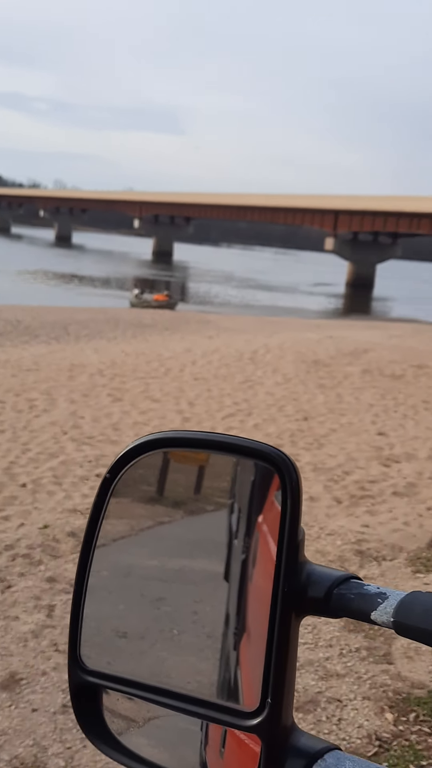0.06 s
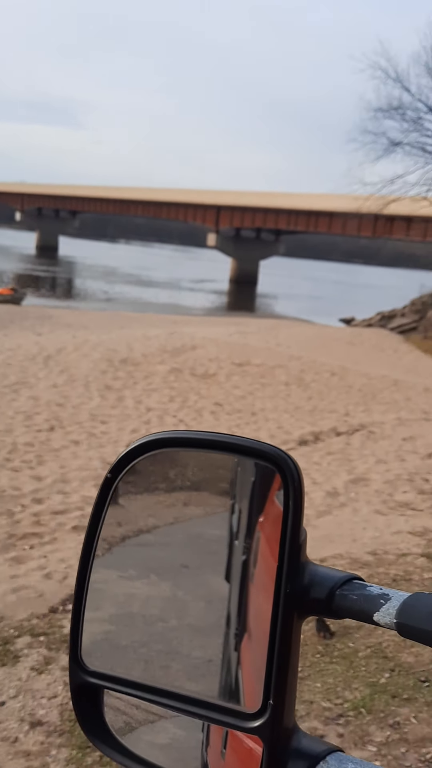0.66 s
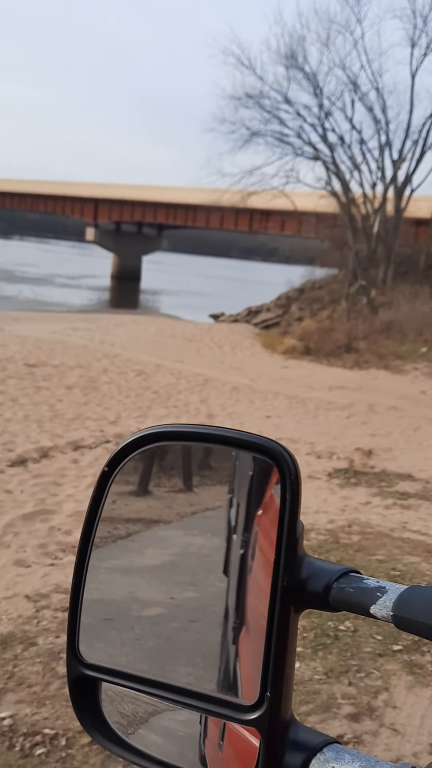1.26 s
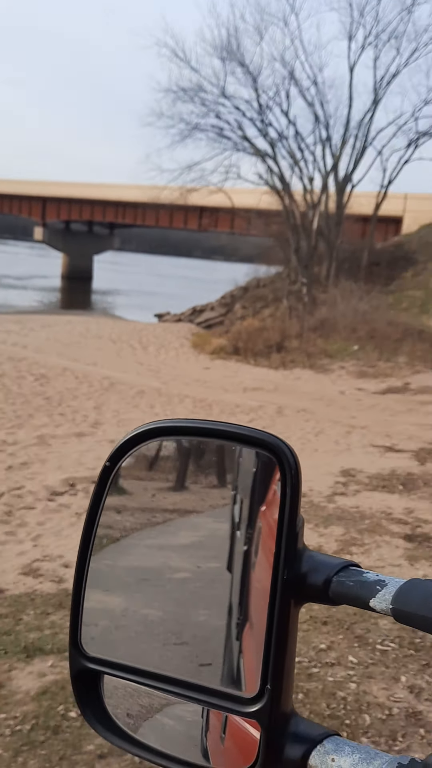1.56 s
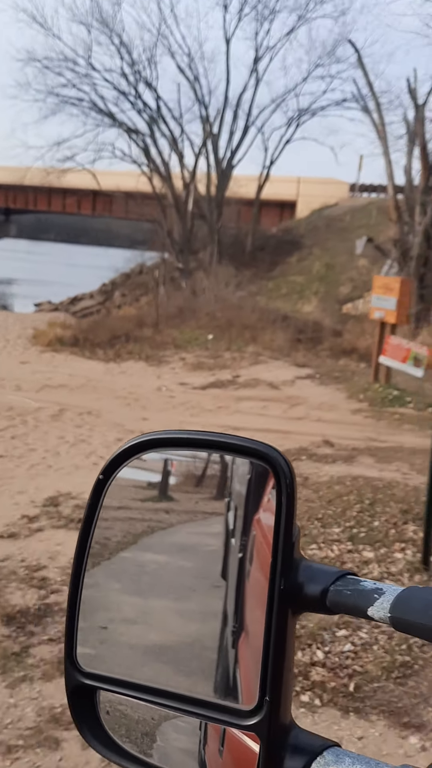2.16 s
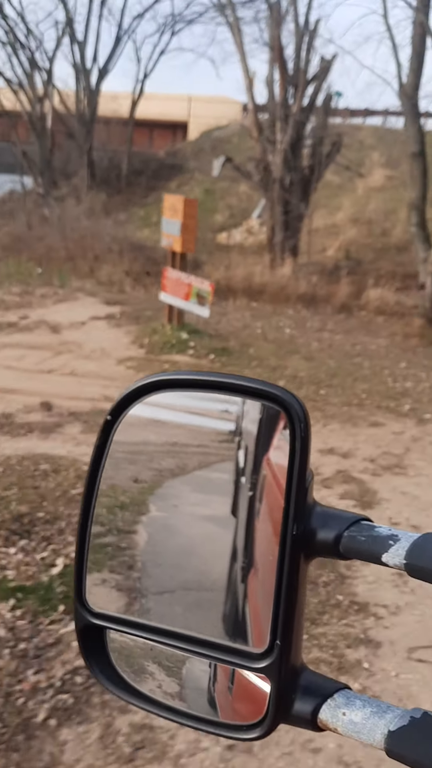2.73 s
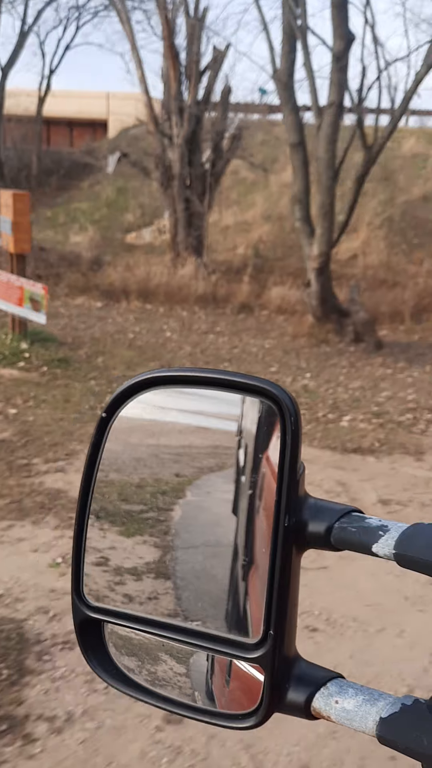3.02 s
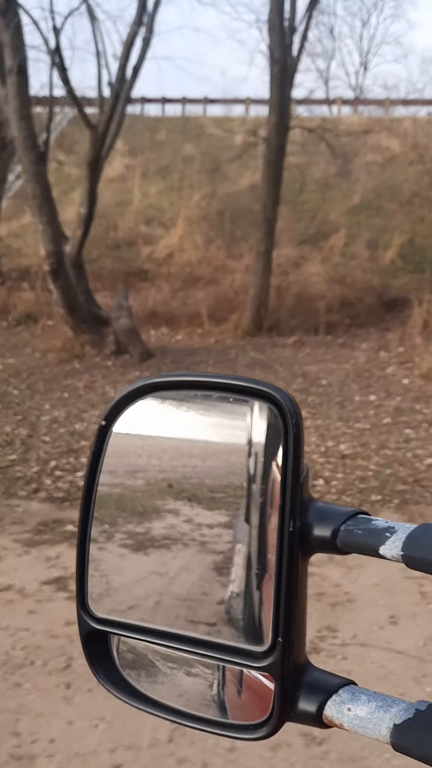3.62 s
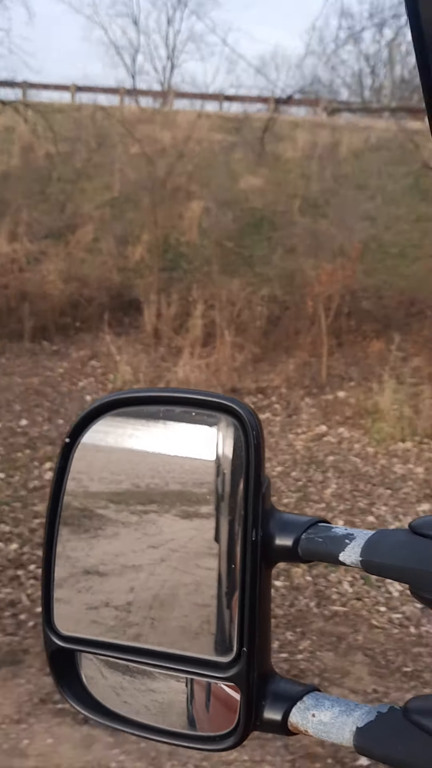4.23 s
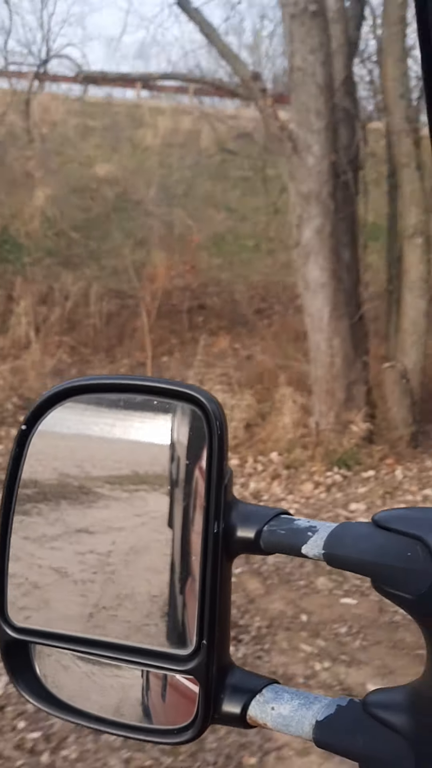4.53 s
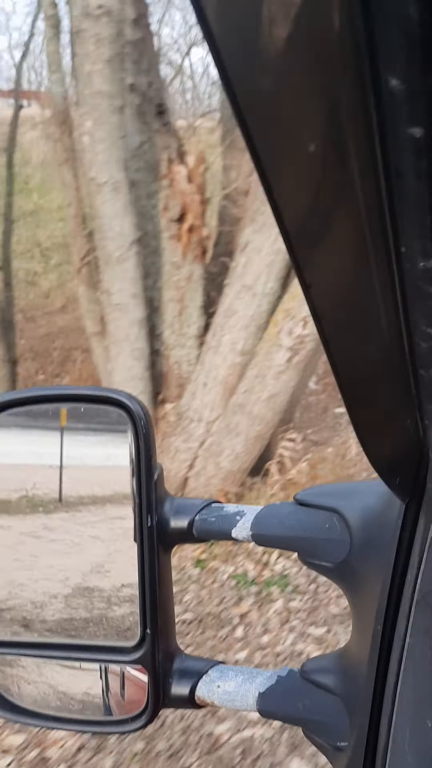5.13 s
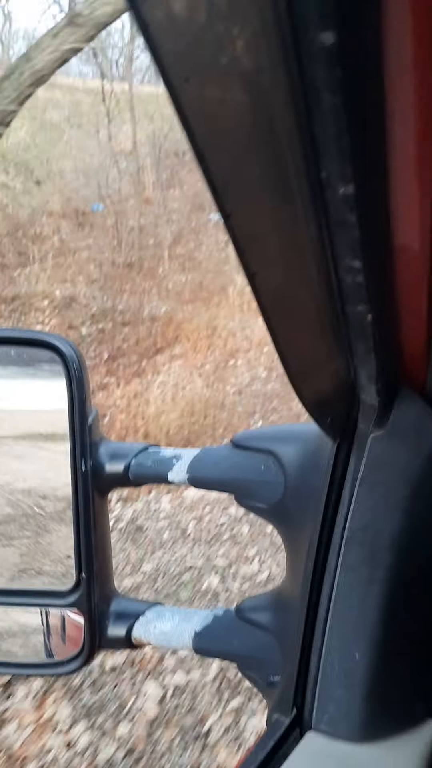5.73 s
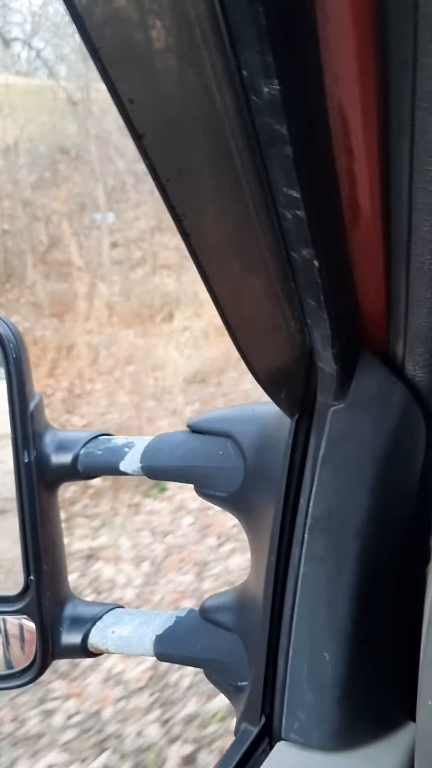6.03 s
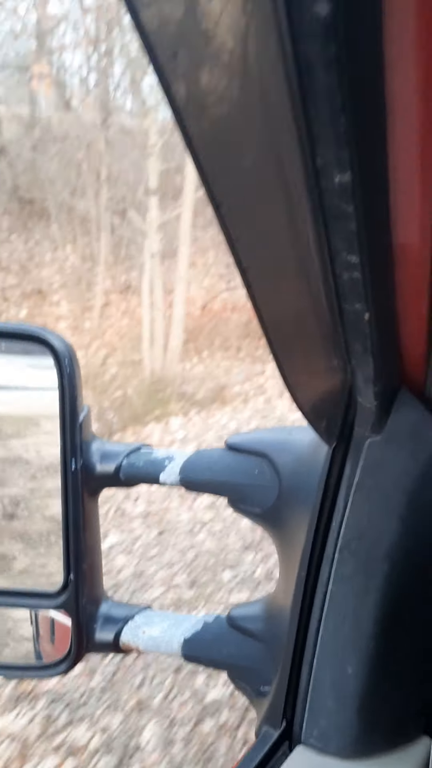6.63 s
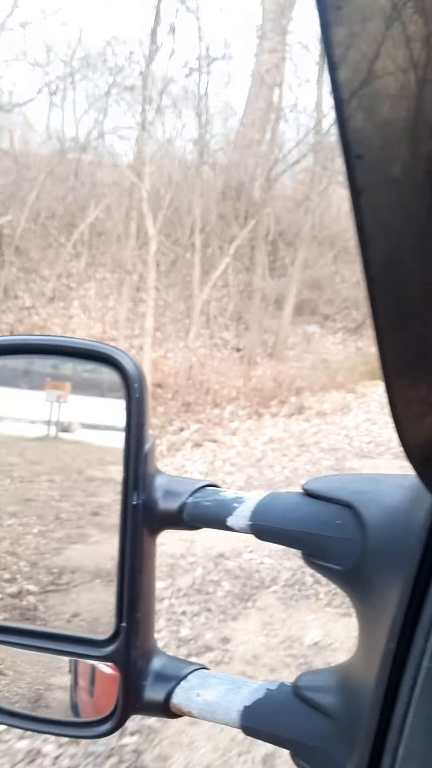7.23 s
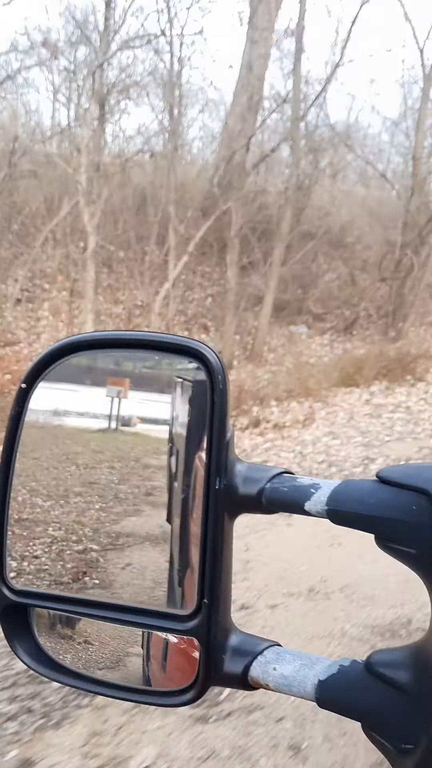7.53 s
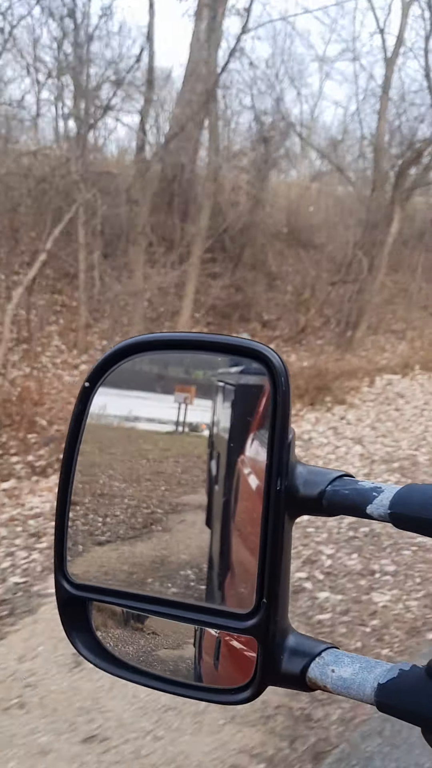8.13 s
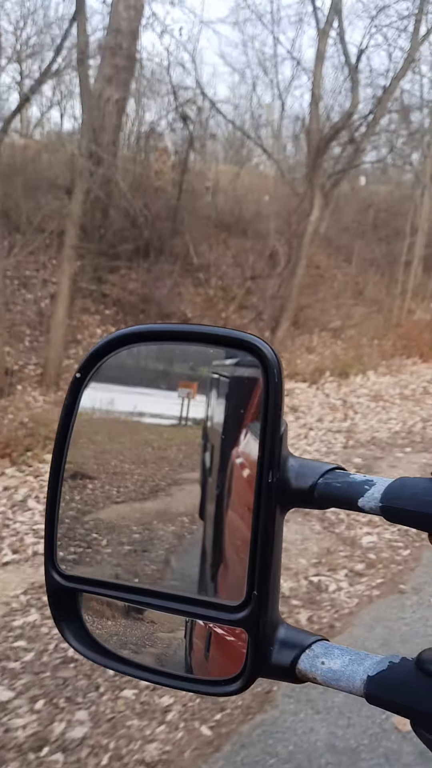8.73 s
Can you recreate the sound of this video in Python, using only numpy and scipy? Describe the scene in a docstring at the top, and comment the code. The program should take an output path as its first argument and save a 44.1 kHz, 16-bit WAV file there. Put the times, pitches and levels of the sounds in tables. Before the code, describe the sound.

From inside a slow-moving pickup, the engine pulls, eases off and plods on while tyres rumble, the body knocks and keys faintly clink.

```python
"""A V8 pulls over beach sand, heard in a pickup's cab by the open window, as a finger bumps the left mic.
The engine eases off, then plods on along a dirt track: its firings boom in the exhaust and growl and
clatter through the engine bay. Under it the tyres rumble over lumps, hiss on sand and crunch stones.
On the track, bumps knock the body, trim snaps, grit ticks and dangling keys clink."""
import sys
import numpy as np
from scipy import signal
from scipy.fft import rfft, irfft, next_fast_len
from scipy.io import wavfile

SR = 44100
rng = np.random.default_rng(int(sys.argv[2]) if len(sys.argv) > 2 else 0)


def int16_out(signal):
    """Quantize to a 16-bit WAV file."""
    q = np.round(np.clip(np.atleast_2d(signal).T, -1, 1) * 32767)
    wavfile.write(sys.argv[1], SR, q.astype(np.int16))


N = 391166

# Stereo width of the cab. Each row: frequency in Hz, left-right likeness (1 is mono).
EAR_LIKENESS = [(60, 1), (130, 1), (290, 0.87), (640, 0.72), (1410, 0.045), (3100, 0.41), (6820, -0.12),
                (15000, 0.02)]
# Tone of the thin hiss. Each row: frequency in Hz, level in dB.
HISS_SPECTRUM = [(3000, -33), (7000, -0.5), (9200, -2), (11000, 3), (13500, 4), (16000, 1.5)]
# Finger bumps on the left mic. Each row: start in seconds, peak in dB, pitch in Hz, length in seconds.
HANDLING_THUMPS = [(0.12, -10.5, 152, 0.022), (0.199, -2, 234, 0.0091), (0.207, -2.5, 127, 0.0095),
                   (0.236, -8, 288, 0.017), (2.103, -1.5, 169, 0.011), (2.120, -1.5, 336, 0.0089),
                   (2.121, -22, 900, 0.0079), (2.174, -3, 170, 0.0064), (2.2, -11, 144, 0.037),
                   (2.235, -4, 267, 0.013), (2.293, -2, 265, 0.012), (2.341, -9.5, 296, 0.0071)]
# Keys touching. Each row: start in seconds, then the level in dB of each of the three keys.
KEY_CLINKS = [(4.73, -70, -70, -56), (5.2146, -55, -62, -53), (5.9047, -47, -57, -32),
              (5.915, -58, -64, -35), (6.025, -60, -72, -68), (6.1924, -60, -51, -44),
              (6.6594, -60, -65, -47), (7.2802, -70, -68, -52), (7.454, -68, -63, -46)]
# One list of modes per key. Each row: pitch in Hz, level in dB, 60 dB ring time in seconds.
KEY_MODES = [
    [(5420, -7, .1), (6952, 0, .36)],
    [(9748, 4, .22), (12875, 8, .09)],
    [(8858, -9, .07), (14365, 1, .08), (14550, -6, .045), (14800, -9, .025), (15100, -9, .02)],
]
# Grit and cracking stones. Each row: start in seconds, level in dB, pitch in Hz, decay in seconds,
# left over right in dB.
GRIT_TICKS = [(0.2114, -8, 1640, 0.00056, 6), (0.2113, -18, 2900, 0.0005, 8),
              (4.263, -25.5, 990, 0.0044, 1), (4.4241, -17, 2500, 0.00046, 3),
              (4.424, -17, 8000, 0.00019, 5), (4.824, -29, 6400, 0.0019, 0),
              (5.1446, -32, 6900, 0.00082, 3), (5.674, -24, 1890, 0.0054, 1), (5.806, -24.5, 950, .005, 1),
              (6.005, -27, 2200, 0.0043, 1), (6.02, -26, 2180, 0.0043, 1), (6.225, -25, 943, .006, 1),
              (6.297, -26, 980, .004, 1), (6.481, -23, 1920, 0.0054, 1), (6.513, -18.5, 1200, 0.0037, 1),
              (6.634, -30, 1590, .003, 1), (6.818, -23.5, 1210, .004, 1), (6.849, -28, 980, 0.0044, -1),
              (6.861, -30, 5600, 0.0033, 2), (6.869, -26, 1720, .003, 1), (6.888, -24, 1830, .004, 1),
              (7.105, -24, 2200, .005, 1), (7.38, -21.5, 5700, 0.0042, 1), (8.343, -23, 1100, 0.0034, 1)]
# Trim close by. Each row: start in seconds, level in dB, left over right in dB, left delay in ms.
TRIM_SNAPS = [(4.4389, 0, -2, 0.29), (7.138, -11, -3, 0.25)]
# Modes of the trim and the body. Each row: pitch in Hz, level in dB, 60 dB ring time in seconds.
TRIM_MODES = [(1400, -17, 0.0027), (2300, -2, 0.0031), (4260, 6, 0.0021), (6800, 1, .0014),
              (11500, -5, .0018), (14000, 0, .0024)]
BODY_MODES = [(121, -20, 0.073), (168.7, 5.5, 0.26), (214, 4, 0.042), (255, -20, 0.051), (307, 5.5, 0.1),
              (327, -6, 0.26), (397.7, -28, 0.041), (530, -7, 0.046), (634, -15, 0.085), (935, -6, 0.014),
              (1320, -16, .03)]
# Bumps that knock the body. Each row: start in seconds, level in dB, favoured pitch in Hz.
BODY_KNOCKS = [(4.590, -9.5, 950), (4.808, -20, 380), (4.835, -12.5, 192), (5.118, -19.5, 320),
               (5.186, -12, 330), (5.208, -11, 259), (5.597, -7, 310), (5.621, -12.5, 315),
               (5.649, -16.5, 650), (5.661, -8.5, 258), (6.061, -8, 300), (6.075, -5.5, 213),
               (6.119, -12, 290), (6.128, -15, 950), (6.76, -18, 304)]
# Roughness of the ground. Each row: time in seconds, roughness in dB.
GROUND_ROUGHNESS = [(0, 0), (.4, -3.5), (.75, -1.27), (2.05, 0.59), (2.4, -5), (3.45, -5.5), (4.15, 5),
                    (4.6, 1), (5.3, 1), (6.9, -0.5), (8.87, 0.9)]
# Tone of the tyre rumble, tread roar and sand hiss. Each row: frequency in Hz, level in dB.
RUMBLE_SPECTRUM = [(15, -36), (28, -25), (42, -5), (60, 4), (100, 3.5), (160, 2), (220, -7.5), (320, -8.5),
                   (450, -24.5), (900, -71)]
ROAR_SPECTRUM = [(120, -6.5), (240, -11), (310, 7.5), (370, -2.5), (460, 3), (700, -6.5), (1000, -5),
                 (1600, -9.5), (2500, -21), (4000, -50)]
SAND_SPECTRUM = [(1500, -8.5), (2600, 7.5), (3400, 4.5), (4500, 0.5), (5400, 0), (7000, -1.5), (8200, -5),
                 (9300, -27), (11000, -31), (15500, -23)]
# Resonances of the cab's air, wheel arch and engine bay. Each row: centre in Hz, width in Hz, lift in dB.
CAB_RESONANCES = [(61.6, 7.4, 3.5), (148, 6.8, 3.5)]
ARCH_RESONANCES = [(2860, 160, 3.5), (3880, 250, 3), (4440, 170, 5.5), (4900, 300, 4.5), (7200, 500, 0.5)]
BAY_RESONANCES = [(314.5, 26.7, 12), (438, 38, 12), (583, 16, 11), (666, 45, 10.5), (1241, 92, 9),
                  (1583, 43, 5), (1650, 30, 6), (2170, 67, 5), (4570, 320, 5)]
# The revs. Each row: time in seconds, firings per second.
FIRING_RATE = [(0, 51.2), (.35, 50.6), (.64, 61.2), (.82, 66.2), (1.1, 67.6), (1.44, 65.4), (1.7, 66.2),
               (1.92, 65.3), (2.08, 65.2), (2.28, 56.8), (2.55, 57.6), (2.95, 53.5), (3.25, 54), (4.3, 53),
               (4.95, 45), (5.6, 45), (6.5, 47.7), (7.2, 48.9), (8.87, 48)]
# The pull: up the sand, off the throttle, on again. Each row: time in seconds, effort in dB.
ENGINE_EFFORT = [(0, -1), (.35, -3), (.7, -1), (2.08, 1.5), (2.14, -3.5), (2.45, -5), (3.55, -6),
                 (3.85, -1), (5, -1.5), (6.3, 1.5), (7, -0.1), (8.87, 0.5)]
# Engine bay whistles. Each row: pitch in Hz, width in Hz.
WHISTLE_TONES = [(1255, 22), (1612, 24)]
# Their levels. Each row: level in dB, dB gained per dB of effort.
WHISTLE_DRIVE = [(-50.5, 0.92), (-56.5, 0.7)]
# Orders that sing out. Each row: start and end in seconds, multiple of the firing rate, level in dB,
# left over right in dB.
WHINE_CUES = [(.7, 2.1, 6.875, -49, 3), (.65, 2.1, 10, -52, 3), (1.2, 2.1, 12, -48, 4),
              (.6, 2.1, 13, -52, 3), (1.3, 2.1, 22.375, -54, 2), (1.15, 2.124, 24.375, -47, 1),
              (2.7, 4.3, 10.5, -51, 3), (2.8, 3.7, 10, -54, 2), (2.7, 3.7, 11, -54, 2),
              (2.65, 3.5, 15, -61, 0), (2.85, 3.7, 23.5, -56, 0), (2.4, 3.7, 31.25, -59, 0),
              (7.4, 8.87, 9, -50, 5)]
# Tone of the clatter. Each row: frequency in Hz, level in dB.
CLATTER_SPECTRUM = [(120, 0.5), (220, 4), (450, -2), (700, -6.5), (1100, -6), (1450, -2), (1750, 3.5),
                    (2100, -7.5), (2600, -12.5), (3200, -15), (4700, -19.5), (5500, -30), (9000, -74)]
# Firing strength in dB of each of the eight cylinders in turn.
CYLINDER_DB = [4, -0.6, 3, 2, 1.5, 3.5, 0.5, 3]
# The weaker orders that growl. Each row: multiple of the firing rate, level in dB.
GROWL_ORDERS = [(1.5, -8), (2.5, -8), (3.25, -13.5), (4, -11.5), (4.625, -19), (5.5, -22.5), (6, -17),
                (6.875, -22.5), (8, -20), (9, -25.5), (10, -32.5), (12, -30), (13, -28.5), (14, -28.5),
                (15, -22.5), (22.375, -27), (26, -31)]
# First, second and third exhaust order. Each row: level in dB, dB gained per dB of effort.
EXHAUST_ORDERS = [(-.5, 1), (1.1, 1.2), (-6.5, 1.5)]
# How the cab booms with the exhaust. Each row: pitch in Hz, gain in dB.
CAB_RESPONSE = [(45, -29.5), (54, -35.5), (66, -32), (90, -35), (104, -29), (134, -26.5), (146, -26.5),
                (162, -36), (200, -38.5)]

# Layer faders. Each pair: level in dB, dB gained per dB of ground roughness or engine effort.
RUMBLE_LEVEL, ROAR_LEVEL, GRAVEL_LEVEL = (-27.5, 0.89), (-35, 0.81), (-46.5, 0.59)
SAND_LEVEL, HISS_LEVEL = (-49, 1.16), (-55, 0.86)
CLATTER_LEVEL, GROWL_LEVEL = (-39, 0.99), (-33, 1)
SAND_ENDS_S, SAND_FADE_S = 3.5, 0.5
CUTOFF_HZ = 15900


def from_db(db):
    """Decibels to gain."""
    return 10 ** (np.asarray(db) / 20)


def rms_one(x):
    """Scale to rms 1."""
    return x / np.sqrt(np.mean(x ** 2) + 1e-20)


def in_time(curve):
    """Read a curve sample by sample."""
    return np.interp(np.arange(N) / SR, *np.transpose(curve))


def at_hz(points, hz):
    """Read a spectrum on a log-frequency axis."""
    points = np.array(points)
    return np.interp(np.log(hz + 1e-9), np.log(points[:, 0]), points[:, 1])


def peaks_db(resonances, hz):
    """Lift that a set of resonances gives at these frequencies."""
    return sum(top / (1 + (2 * (hz - centre) / width) ** 2) for centre, width, top in resonances)


def pan(db):
    """Left and right gains, the left louder by db."""
    return from_db(np.array([[.5], [-.5]]) * db)


def left_lift(db):
    """Gains that raise the left channel alone."""
    return from_db(np.array([[1], [0]]) * db)


def swell(start_s, end_s, fade_s):
    """Rise from 0 to 1, hold, fall back."""
    t = np.arange(N) / SR
    return np.clip(np.minimum(t - start_s, end_s - t) / fade_s, 0, 1)


def hold_until(end_s, fade_s):
    """Hold at 1, then fade to 0."""
    return 1 - np.clip((np.arange(N) / SR - end_s) / fade_s, 0, 1)


def driven(level, control_db):
    """Gain of a layer that rides a control."""
    db, follows = level
    return from_db(db + follows * control_db)


def drift(rate_hz):
    """A slow random wobble of rms about 1."""
    r = np.exp(-80 * np.pi * rate_hz / SR)
    slow = signal.lfilter([1], [1, -2 * r, r * r], rng.standard_normal(N // 40 + 2002))[2000:]
    return np.interp(np.arange(N) / 40, np.arange(len(slow)), rms_one(slow))


def noise():
    """Two unrelated white noises."""
    return rng.standard_normal((2, N))


def band_noise(order, low_hz, high_hz, shape):
    """Band-passed noise of rms 1."""
    band = signal.butter(order, [low_hz, high_hz], "band", fs=SR, output="sos")
    return rms_one(signal.sosfilt(band, rng.standard_normal(shape)))


def ring(x, hz, t60):
    """A resonator: a unit click sets a sine of height 1 ringing."""
    r, w = from_db(-60 / (t60 * SR)), 2 * np.pi * hz / SR
    return signal.lfilter([0, np.sin(w)], [1, -2 * r * np.cos(w), r * r], x + 1e-18)


def struck(hz, t60, t):
    """A struck mode: a sine that dies by 60 dB in t60 seconds."""
    return np.sin(2 * np.pi * hz * t) * np.exp(-np.log(1000) * t / t60)


def add(out, s, sound):
    """Mix a short sound in at s seconds."""
    at = round(s * SR)
    out[..., at:at + sound.shape[-1]] += sound[..., :N - at]


def in_cab(pair, spectrum, resonances=()):
    """Colour two unrelated signals and blend them into left and right, alike in the bass."""
    size = next_fast_len(N)
    hz = np.arange(size // 2 + 1) * SR / size
    alike = np.clip(at_hz(EAR_LIKENESS, hz), 0, .95)
    mid, side = rfft(pair, size) * from_db(at_hz(spectrum, hz) + peaks_db(resonances, hz))
    ears = np.sqrt(1 + alike) * mid + np.sqrt(1 - alike) * side * [[1], [-1]]
    return rms_one(irfft(ears, size)[:, :N])


def hiss(effort_db, swell_db=5.5):
    """A thin hiss, mostly on the left, that rises with effort and swells once."""
    gain = driven(HISS_LEVEL, effort_db) * from_db(swell_db * swell(1.175, 1.64, fade_s=.16))
    return gain * in_cab(noise(), HISS_SPECTRUM) * from_db([[0], [-16]])


def port_wind(level_db=-32, lump_db=-1.5):
    """Wind rumbles in lumps on the left microphone port alone."""
    return from_db(level_db + lump_db * drift(9.7)) * band_noise(2, 60, 220, N) * [[1], [0]]


def handling_thumps(low_hz=75, edge_ratio=1.79, ragged=0.57):
    """A finger bumps and rubs the left mic: a few ragged cycles over a slower heave."""
    out, t = np.zeros(N), np.arange(4096) / SR
    for s, db, hz, length in HANDLING_THUMPS:
        swing = np.sin(2 * np.pi * hz * t) + ragged * band_noise(4, low_hz, edge_ratio * hz, len(t))
        heave = np.sin(np.pi * hz * t)
        thump = (swing + heave) * t * np.exp(-2 * t / length)
        add(out, s, from_db(db) * thump / np.abs(thump).max())
    return out * from_db([[0], [-21]])


def bass_dip(x, below_hz=190):
    """The bass drops out for a moment."""
    thin = signal.sosfilt(signal.butter(2, below_hz, "high", fs=SR, output="sos"), x)
    return x + swell(2.29, 2.66, fade_s=0.16) * (thin - x)


def keys(jingle_per_s=18, jingle_db=-68, scatter_db=1.2):
    """Dangling keys clink now and then and tremble lightly for a while; each rings with its own modes."""
    out, t = np.zeros((2, N)), np.arange(16384) / SR
    touch_rate = jingle_per_s * swell(6.95, 7.75, fade_s=.3)
    touch_times = np.flatnonzero(rng.random(N) < touch_rate / SR) / SR
    jingle = [[s] + [jingle_db] * len(KEY_MODES) for s in touch_times]
    for s, *strengths in list(KEY_CLINKS) + jingle:
        for db, key in zip(strengths, KEY_MODES):
            hz, mode_db, t60 = np.array(key).T
            gains = from_db(db + mode_db + scatter_db * rng.standard_normal((2, len(hz))))
            add(out, s, gains @ struck(hz[:, None], t60[:, None], t))
    return out


def grit(crack=0.18, gain_db=-4.5):
    """Grit snaps: a few cycles of ring and a burst of noise an octave wide around the same pitch."""
    out, t = np.zeros((2, N)), np.arange(2048) / SR
    for s, db, hz, decay, side_db in GRIT_TICKS:
        burst = band_noise(2, hz / np.sqrt(2), min(hz * np.sqrt(2), CUTOFF_HZ), (2, len(t)))
        tick = (np.sin(2 * np.pi * hz * t) / 2 + crack * burst) * np.sqrt(t) * np.exp(-t / decay)
        tick /= np.abs(tick).max(axis=1, keepdims=True)
        add(out, s, from_db(db + gain_db) * pan(side_db) * tick)
    return out


def trim_snaps(scatter_db=1.0):
    """One hard release sets the trim ringing for a millisecond or two; it reaches the right mic first."""
    out, t = np.zeros((2, N)), np.arange(512) / SR
    hz, mode_db, t60 = np.array(TRIM_MODES).T[:, :, None, None]
    for s, db, side_db, lag_ms in TRIM_SNAPS:
        age = np.maximum(t - np.array([[lag_ms / 1000], [0]]), 0)
        gains = from_db(mode_db + scatter_db * rng.standard_normal((len(TRIM_MODES), 2, 1)))
        snap = np.sum(gains * struck(hz, t60, age), axis=0)
        add(out, s, from_db(db) * pan(side_db) * snap / np.abs(snap).max())
    return out


def body_knocks(reach_octaves=.5, rattle=0.1, rattle_s=0.025):
    """Bumps knock the body; each favours the modes near its own pitch and sets loose panels rattling."""
    out, t = np.zeros(N), np.arange(8192) / SR
    hz, mode_db, t60 = np.array(BODY_MODES).T[:, :, None]
    for s, db, centre in BODY_KNOCKS:
        nearness = 1 / (1 + (np.log2(hz / centre) / reach_octaves) ** 2)
        gains = nearness * from_db(mode_db + rng.normal(0, 0.46, hz.shape))
        knock = np.sum(gains * struck(hz, t60, t), axis=0)
        panels = rattle * np.exp(-t / rattle_s) * band_noise(3, 160, 470, len(t))
        add(out, s, from_db(db) * (panels - knock / np.abs(knock).max()))
    return out * pan(2.3)


def gravel(rough_db, on_sand, stones_per_s=80, patch_db=4.5, sand_softens_db=8, ring_cycles=22):
    """Stones crunch under the tread, each a short swelling ring; rough dirt has more and louder ones."""
    loose_patch = swell(5.4, 7, fade_s=.35)
    stony_db = rough_db + patch_db * loose_patch - sand_softens_db * on_sand
    at = np.flatnonzero(rng.random(N) < stones_per_s * from_db(stony_db) / SR)
    pitches = np.geomspace(760, 2250, num=18)
    pitch_index = rng.integers(0, len(pitches), len(at))
    size_db = np.minimum(rng.exponential(1, len(at)), 2)
    clicks = np.zeros((len(pitches), N))
    clicks[pitch_index, at] = from_db(size_db) * rng.choice([-1, 1], len(at))
    crunch = np.zeros((2, N))
    for train, hz in zip(clicks, pitches):
        t60 = ring_cycles / hz
        # ringing twice rounds off the attack
        crunch += ring(ring(train, hz, t60), hz, t60) * pan(rng.normal(1, 2.5))
    return driven(GRAVEL_LEVEL, stony_db) * rms_one(crunch)


def tyre_rumble(rough_db, on_sand, lump_db=2.0, cushion_db=1.5):
    """Lumpy ground shakes the cab; soft sand cushions it a little."""
    gain = driven(RUMBLE_LEVEL, rough_db) * from_db(lump_db * drift(12) - cushion_db * on_sand)
    return gain * in_cab(noise(), RUMBLE_SPECTRUM, CAB_RESONANCES) * pan(0.62)


def tread_roar(rough_db, crunch_db=1.88):
    """The tread roars unevenly, louder on rough ground."""
    gain = driven(ROAR_LEVEL, rough_db) * from_db(crunch_db * drift(27))
    return gain * in_cab(noise(), ROAR_SPECTRUM) * pan(2.3)


def sand_hiss(effort_db, grain_db=1.5):
    """Sand hisses in the wheel arch as the wheels pull."""
    gain = driven(SAND_LEVEL, effort_db) * from_db(grain_db * drift(26))
    return gain * in_cab(noise(), SAND_SPECTRUM, ARCH_RESONANCES) * pan(0.82)


def whistles(effort_db):
    """Air whistles at fixed pitches whatever the revs: noise twice through a narrow resonance."""
    out = np.zeros(N)
    for (hz, width), level in zip(WHISTLE_TONES, WHISTLE_DRIVE):
        b, a = signal.iirpeak(hz, hz / width, fs=SR)
        tone = signal.lfilter(b, a, signal.lfilter(b, a, rng.standard_normal(N)))
        out += driven(level, effort_db) * rms_one(tone)
    return out


def order_tone(firings, multiple, db):
    """One engine order of a given rms level, its phase slightly unsteady."""
    phase = 2 * np.pi * (multiple * firings + rng.random()) + 0.11 * drift(3.2)
    return np.sqrt(2) * from_db(db) * np.sin(phase)


def whines(firings, fade_s=0.2, waver_db=2.4):
    """Single engine orders sing out on cue, fading twice as fast as they swell."""
    out, t = np.zeros((2, N)), np.arange(N) / SR
    for start, end, multiple, db, side_db in WHINE_CUES:
        gate = np.clip(np.minimum(t - start, 2 * (end - t)) / fade_s, 0, 1)
        out += gate * order_tone(firings, multiple, db + waver_db * drift(3.1)) * pan(side_db)
    return out


def clatter(firings, decay_s=0.028, scatter_db=-0.1, repeating=1.2, fresh=1.1):
    """Every cylinder fires with a knock of its own that repeats each cycle, plus a puff of fresh noise."""
    at = np.flatnonzero(np.diff(np.floor(firings)))
    cylinders = np.arange(len(at)) % len(CYLINDER_DB)
    strengths = from_db(np.array(CYLINDER_DB)[cylinders] + scatter_db * rng.standard_normal(len(at)))
    fade = np.exp(-np.arange(2048) / SR / decay_s)
    shared_knock = rng.standard_normal((2, len(fade)))
    knocks = shared_knock + repeating * rng.standard_normal((len(CYLINDER_DB), 2, len(fade)))
    out = np.zeros((2, N))
    for sample, cylinder, gain in zip(at, cylinders, strengths):
        puff = fresh * rng.standard_normal((2, len(fade)))
        add(out, sample / SR, gain * fade * (knocks[cylinder] + puff))
    return in_cab(out, CLATTER_SPECTRUM, BAY_RESONANCES)


def growl(firing_hz, firings, bay_share=0.71, flutter_db=2.6):
    """Higher orders flutter, and swell as they pass through the bay's resonances."""
    out = np.zeros(N)
    for multiple, db in GROWL_ORDERS:
        bay_db = bay_share * peaks_db(BAY_RESONANCES, multiple * firing_hz)
        out += order_tone(firings, multiple, db + bay_db + flutter_db * drift(3.6))
    return out


def exhaust(firing_hz, firings, effort_db, throb_db=1.25):
    """The lowest orders throb, grow with effort and boom where the cab favours them."""
    out = np.zeros(N)
    for multiple, (db, follows) in enumerate(EXHAUST_ORDERS, 1):
        boom_db = db + follows * effort_db + at_hz(CAB_RESPONSE, multiple * firing_hz)
        out += order_tone(firings, multiple, boom_db + throb_db * drift(18))
    return out


def engine(effort_db, left_loud):
    """The V8: exhaust boom, growl, clatter and whines locked to the firings, plus steady whistles."""
    firing_hz = in_time(FIRING_RATE)
    firings = np.cumsum(firing_hz) / SR
    growling = driven(GROWL_LEVEL, effort_db) * growl(firing_hz, firings) * pan(1.4)
    clattering = driven(CLATTER_LEVEL, effort_db) * clatter(firings) * pan(0.69)
    top_end = clattering + whistles(effort_db)
    bay = growling * left_lift(1.5 * left_loud) + top_end * left_lift(8.5 * left_loud)
    return exhaust(firing_hz, firings, effort_db) * pan(0.56) + bay + whines(firings)


def scene(left_lag_samples=6):
    """The mix: engine, tyres and small rattles in the cab; handling, wind and hiss at the left mic."""
    effort_db, rough_db = in_time(ENGINE_EFFORT), in_time(GROUND_ROUGHNESS)
    on_sand = hold_until(SAND_ENDS_S, SAND_FADE_S)
    left_loud = hold_until(2.33, fade_s=0.03)  # at first the left mic is the louder one
    rumble = tyre_rumble(rough_db, on_sand)
    tread = (tread_roar(rough_db) + sand_hiss(effort_db)) * left_lift(2.5 * left_loud)
    ground = rumble + tread + gravel(rough_db, on_sand)
    left, right = engine(effort_db, left_loud) + ground + body_knocks() + grit() + keys()
    # sound from the cab reaches the left mic just after the right
    late_left = np.pad(bass_dip(left), (left_lag_samples, 0))[:N]
    cab = np.array([late_left, right])
    return cab + trim_snaps() + handling_thumps() + left_loud * port_wind() + hiss(effort_db)


def record(dry, notch_hz=9420, notch_width_hz=1080, notch_depth=0.22):
    """The mics lose the deepest bass and a slice of treble; peaks clip and the top is cut."""
    notched = signal.lfilter(*signal.iirnotch(notch_hz, notch_hz / notch_width_hz, fs=SR), dry)
    heard = dry + notch_depth * (notched - dry)
    low_cut = signal.butter(2, 22, "high", fs=SR, output="sos")
    high_cut = signal.ellip(12, .1, 80, CUTOFF_HZ, fs=SR, output="sos")
    clipped = np.clip(signal.sosfilt(low_cut, heard), -1, 1)
    return signal.sosfilt(high_cut, clipped)


dry = scene()
out = record(dry)
int16_out(out)
```